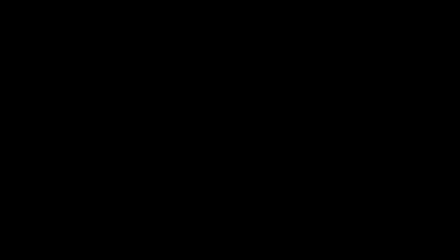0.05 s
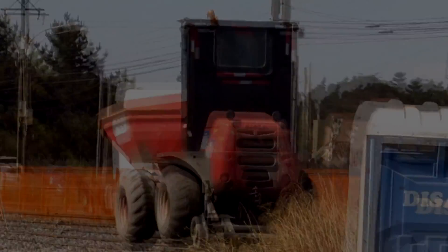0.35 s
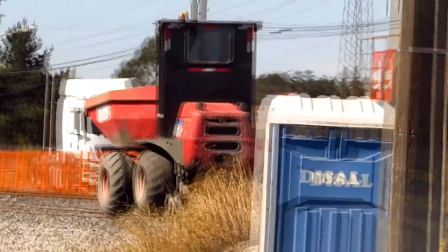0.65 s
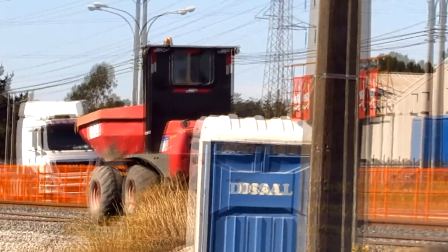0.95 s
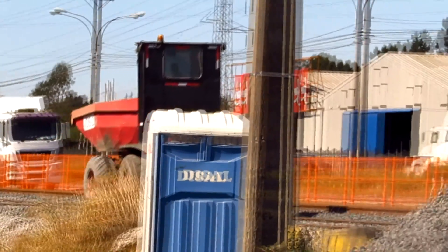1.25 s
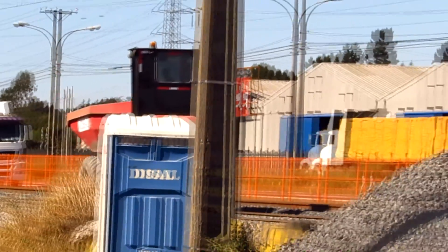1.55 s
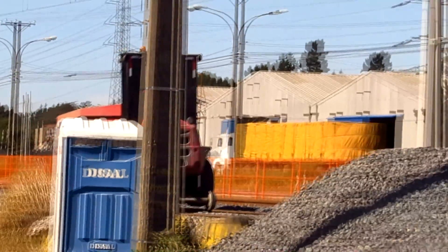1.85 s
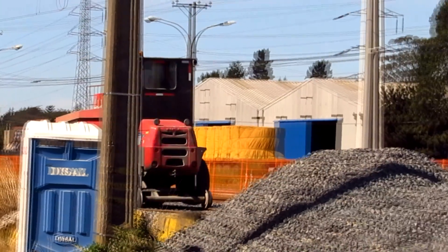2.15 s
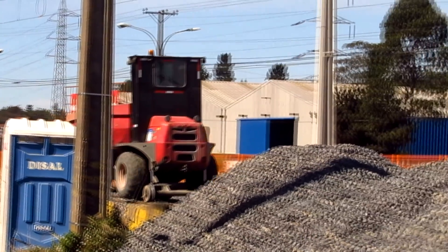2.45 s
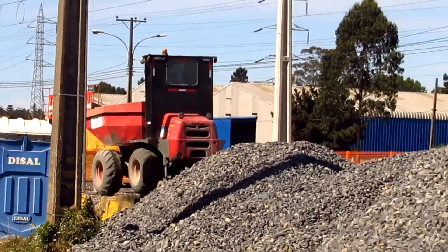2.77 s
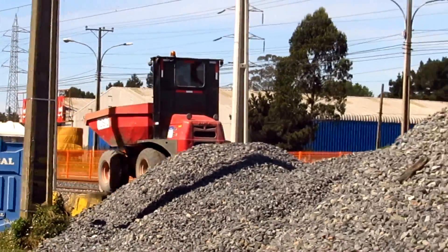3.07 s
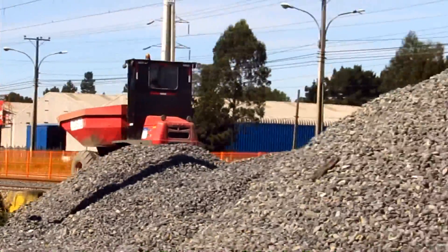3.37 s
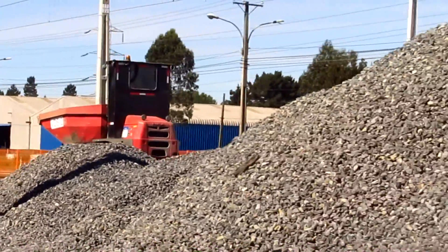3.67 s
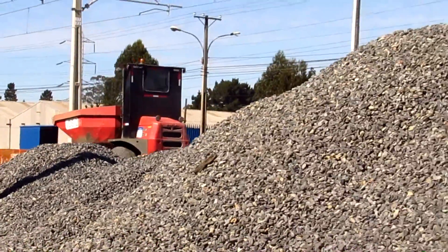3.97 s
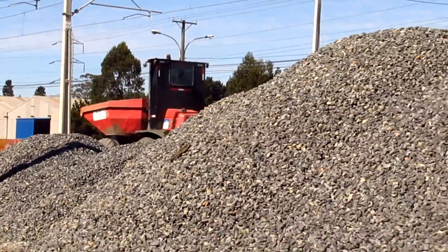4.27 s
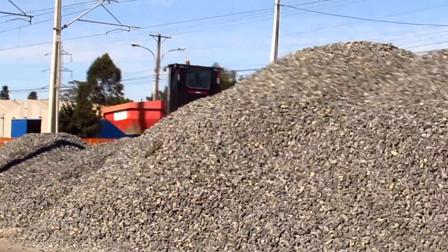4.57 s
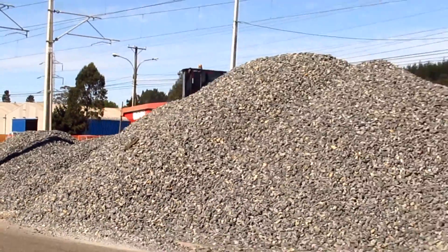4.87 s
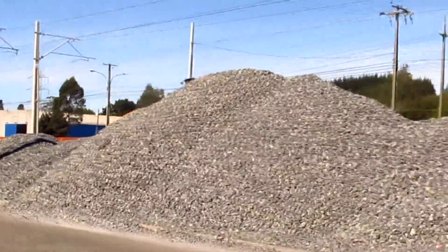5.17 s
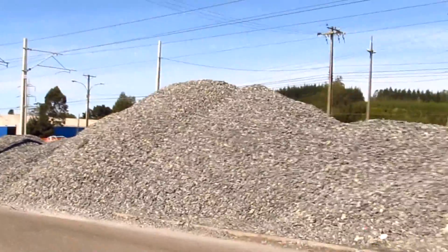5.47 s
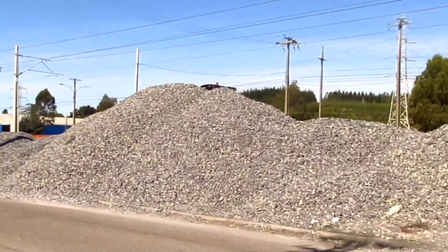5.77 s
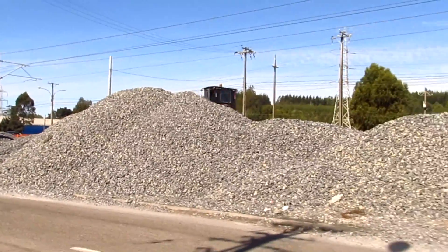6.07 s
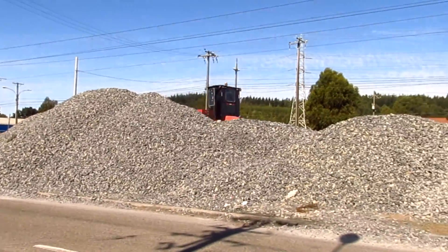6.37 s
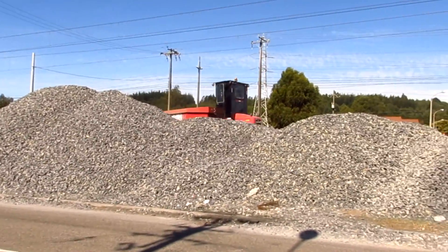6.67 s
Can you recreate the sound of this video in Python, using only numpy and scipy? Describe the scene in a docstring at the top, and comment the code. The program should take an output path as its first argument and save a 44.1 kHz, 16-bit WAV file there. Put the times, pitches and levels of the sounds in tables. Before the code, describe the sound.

A diesel rail dumper rolls along an outdoor track some way off, rumbling and clattering under a thin whine. A bright hiss cuts off near the start, and steel squeaks faintly. Strong gusts then buffet and crackle on the microphone, and the engine dips before creeping back. Later come a brief metal groan, low thuds and a wavering wheel ring, with a faint high shimmer from the rail.

```python
"""A diesel rail dumper rolls along a track some way off: its cylinders rumble and clatter, its exhaust booms,
its drive whines. The engine's sound comes up in level as a bright hiss stops, and steel squeaks on steel.
From about 1.5 s gusts buffet the microphone; the gain control ducks everything and creeps back.
Near 4.3 s the rail starts to sing. The machine thuds and passes behind a gravel heap, where a rubbed
wheel begins to ring and something ticks once; at 6.5 s it comes clear and the rail sings louder."""
import sys
import numpy as np
from scipy import signal
from scipy.fft import rfft, irfft, next_fast_len
from scipy.io import wavfile
from scipy.ndimage import uniform_filter1d

SR = 44100
rng = np.random.default_rng(int(sys.argv[2]) if len(sys.argv) > 2 else 0)


def output_pcm(signal):
    """Save a mono or channel-first signal as 16-bit PCM at the path in sys.argv[1].

    Samples are clipped to [-1, 1] before scaling.
    """
    pcm = np.clip(np.atleast_2d(signal).T, -1, 1) * 32767
    wavfile.write(sys.argv[1], SR, np.round(pcm).astype(np.int16))


N = 305613
T = np.arange(N) / SR
HZ = np.fft.rfftfreq(N, 1 / SR)

# tone colour of the engine's rumble and clatter: (frequency [Hz], relative level [dB])
ENGINE_EQ = [(25,-21), (45,-12), (70,-2.5), (100,-3.5), (145,-2), (200,-3.5), (270,-4.5), (340,-10),
             (480,-16), (680,-18), (870,-23.5), (1150,-25.5), (1600,-33), (2300,-39)]
# punch of each cylinder, in firing order: (relative level [dB])
CYLINDER_ACCENTS = [-6, -4, 1.5, -1]
# steady engine tones: (pitch [multiple of the firing rate], level against the rumble [dB])
ENGINE_TONES = [(1, -12), (1.249, -9.5), (1.5, -22), (1.999, -14.5), (3.33, -13), (3.85, -11),
                (6.44, -17.5)]
# fader ride of the clatter as the machine passes: (time [s], level [dB])
CLATTER_RIDE = [(.25, -32), (1.5, -31.5), (1.75, -29.5), (2.05, -30.5), (2.7, -32), (3.15, -28.5),
                (4.3, -30.5), (5.6, -31.5), (6.93, -30)]
# hiss of the running gear: (frequency [Hz], relative level [dB])
GEAR_HISS_EQ = [(1900,2), (2500,1.5), (3100,-5), (3550,-6.5), (4100,-7.5), (4650,-6.5), (5600,-9.5),
                (7200,-14.5), (9500,-20.5), (15000,-29.5)]
# the drive's whine, sinking as the drive slows: (time [s], pitch [Hz])
WHINE_PITCH = [(.25, 1762), (.8, 1762), (1.2, 1712), (1.55, 1675), (1.87, 1636), (2.17, 1610), (2.3, 1672),
               (2.45, 1630), (2.9, 1625), (3.5, 1606), (4.4, 1578), (5.3, 1596), (5.75, 1597), (6.2, 1583),
               (6.5, 1568), (6.93, 1548)]
# spells where the whine firms up: (start [s], end [s], level [dB])
WHINE_SPELLS = [(0.193, 0.472, -47), (.47, 0.713, -54), (0.825, 0.89, -48), (1.18, 1.77, -48),
                (1.77, 1.955, -45.5), (2.24, 2.346, -48), (2.883, 3.35, -52.5), (3.35, 4.03, -47),
                (4.08, 4.5, -57), (5.35, 6.1, -56), (6.424, 6.92, -45.8)]
# tone colour of the opening spurt of hiss: (frequency [Hz], relative level [dB])
SPURT_EQ = [(900, 9.5), (1400, 5.5), (1750, 9), (2400, 4), (3200, -2), (5000, -10), (7000, -17),
            (10000, -27), (15000, -46)]
# whistles inside the spurt: (pitch [Hz], relative level [dB])
SPURT_TONES = [(1680, -41.5), (1843, -55.5), (2039, -48), (2159, -52), (2480, -57), (2729, -59),
               (2872, -54), (3029, -64), (3440, -58), (4510, -67)]
# gusts on the microphone: (start [s], end [s], level [dB], fine eddies against the gust [dB])
WIND_GUSTS = [(1.39, 1.42, -20, -1.5), (1.563, 1.639, -12, 0), (1.628, 1.744, -10, -35),
              (1.796, 1.883, -3.5, -35), (1.903, 1.957, 6, -25), (2.091, 2.306, 3, -24.5),
              (2.396, 2.413, -10.5, 1), (2.449, 2.479, -14, -10), (2.496, 2.531, 7, -11),
              (2.537, 2.589, 2.5, -11.5), (4.27, 4.284, -7.5, -31), (4.44, 4.514, -15.5, -23),
              (4.726, 4.771, -25, -31), (5.389, 5.435, -17, -29.5)]
# buffeting of a strong gust: (frequency [Hz], relative level [dB])
WIND_EQ = [(20, -40.5), (45, -11.5), (80, -4), (145, 2.5), (220, -2.5), (330, -10.5), (480, -22.5),
           (750, -47.5), (1500, -66), (4000, -99)]
# single eddies slapping the microphone: (time [s], signed peak [relative], pitch [Hz], half length [s])
EDDY_SLAPS = [(1.4307, 1.25, 140, .0058), (1.5688, -2.5, 170, .0035), (1.6066, 5.7, 140, .0027),
              (1.9151, 3.5, 220, .0025), (1.9455, -3.6, 200, .0025), (2.4098, 4.6, 230, .0024),
              (2.4906, 6.2, 300, .0026), (2.5072, -2.2, 190, .003), (2.561, 2.1, 430, .0014)]
# sharp overload cracks on the wind slaps, in both channels:
# (time [s], signed peak [linear], pitch [Hz], half length [s])
OVERLOAD_CRACKS = [(1.5686, -.03, 1400, .00025), (1.6066, .24, 1200, .00019), (2.4906, .26, 1400, .00016),
                   (2.5068, .06, 1100, .0011), (2.5295, .06, 850, .001), (2.5614, .11, 850, .0008)]
# steel squeaks, groans and scrapes: (start [s], end [s], pitch [Hz], width [Hz], level [dB])
STEEL_SQUEAKS = [(0.678, 0.707, 3170, 70, -58), (.83, 0.872, 4890, 260, -65),
                 (0.91, 0.948, 4840, 170, -59.5), (.99, 1.35, 5700, 1200, -66),
                 (3.773, 3.815, 5300, 200, -65), (3.815, 3.882, 4830, 350, -66), (4.72, 5.05, 562, 24, -39),
                 (4.79, 4.95, 7200, 3000, -68), (5.2, 5.335, 950, 35, -42), (5.53, 5.88, 7340, 2400, -68.5),
                 (5.55, 6.5, 1300, 30, -55), (5.6, 5.63, 11050, 300, -70), (6.52, 6.847, 6950, 1310, -67),
                 (6.551, 6.95, 2490, 600, -56.5)]
# deep thuds of the machine: (time [s], signed peak [linear], pitch [Hz], half length [s])
MACHINE_THUDS = [(4.8, 0.057, 80.1, 0.15), (4.956, 0.055, 95, 0.015), (5.335, 0.083, 148.4, 0.046),
                 (5.525, 0.079, 153, 0.016), (5.79, 0.11, 116, .025), (5.887, 0.18, 149, 0.019),
                 (6.015, 0.16, 132, 0.011), (6.14, 0.18, 141, 0.0077), (6.225, 0.083, 113, 0.012),
                 (6.27, 0.14, 123, 0.018), (6.415, 0.16, 142, 0.059), (6.54, 0.072, 223.7, 0.014),
                 (6.765, 0.095, 144.6, 0.029), (6.8243, -0.25, 156, 0.0048), (6.833, 0.15, 239, 0.0091)]
# the ringing wheel: (time [s], pitch [Hz])
WHEEL_PITCH = [(5.82, 930), (5.94, 972), (6.06, 1016), (6.3, 982), (6.93, 970)]
# the microphone pair: (frequency [Hz], left minus right [dB], left lead [rad], likeness [0-1])
STEREO_IMAGE = [(40.4, 14.5, -0.074, 0.84), (154, 16.5, -1.28, 0.89), (277, 13.5, -1.02, 0.89),
                (483, 8, -1.25, 1), (1010, 2, -0.64, 0.7), (2500, 0, -0.35, 0.97), (4460, 1, -0.2, 0.83),
                (7140, 0, -0.97, 0.31), (12000, -0.5, -1.84, 0.33)]

# the machine slips behind the gravel heap, then comes clear: (time [s], soft edge [s])
HIDE, CLEAR = (5.03, 0.13), (6.48, 0.069)


def amp(db):
    """Decibels to gain."""
    return 10 ** (np.asarray(db) / 20)


def unit_rms(x):
    """Scales to rms 1."""
    return x / np.sqrt(np.mean(x ** 2) + 1e-20)


def automation(rows):
    """A line through (time, value) points, at every sample."""
    return np.interp(T, *np.transpose(rows))


def spectra(rows):
    """Each column of a table of frequencies, at every bin."""
    hz, *columns = np.transpose(rows)
    return [np.interp(np.log(HZ + 1), np.log(hz), column) for column in columns]


def shaped(x, gain):
    """Filters by a gain per bin; rms 1."""
    return unit_rms(irfft(rfft(x) * gain, N))


def lowpass(hz, order):
    """Gain of a low-pass at every bin."""
    return 1 / np.sqrt(1 + (HZ / hz) ** (2 * order))


def noise():
    """White noise."""
    return rng.standard_normal(N)


def drift(rate_hz):
    """A random wobble up to about the given rate; rms 1."""
    size = next_fast_len(N)
    rolloff = np.sqrt(1 + (np.fft.rfftfreq(size, 1 / SR) / rate_hz) ** 6)
    return unit_rms(irfft(rfft(rng.standard_normal(size)) / rolloff, size)[:N])


def resonance(hz, width_hz):
    """A randomly excited ring, a narrow band of noise whose pitch may glide."""
    angle = 2 * np.pi * np.cumsum(hz * np.ones(N)) / SR
    return unit_rms(drift(width_hz / 2) * np.cos(angle) + drift(width_hz / 2) * np.sin(angle))


def rise(start, edge):
    """A soft step from 0 to 1."""
    return (1 + np.tanh((T - start) / edge)) / 2


def gate(start, end, edge):
    """Opens between two times, with soft edges."""
    return rise(start, edge) - rise(end, edge)


def puffs(rows, lag=0):
    """Short pressure swings, each under a bell-shaped fade."""
    t = T - lag
    return sum(peak * np.cos(2 * np.pi * hz * (t - at)) * np.exp(-np.minimum(((t - at) / half) ** 2, 50))
               for at, peak, hz, half in rows)


def engine(firing_hz=73.4, unevenness=0.35, knock=0.042, pulse_share=0.3, opening_dip_db=-5):
    """Four cylinders fire: pulses and turbulent gas rumble, metal clatters, the running gear hisses."""
    turns = np.cumsum(firing_hz * (1 + 0.00828 * drift(2.96))) / SR  # one turn per firing
    firing = turns.astype(int)
    strength = amp(CYLINDER_ACCENTS)[firing % len(CYLINDER_ACCENTS)] * (1 + unevenness * noise()[firing])
    pulses = unit_rms(np.diff(firing, prepend=0) * strength)
    knocks = unit_rms(strength * np.exp(-(turns % 1) / 0.65))
    rattle = (1 + knock * knocks) * amp(0.5 * drift(65))

    # rumble and hiss partly follow the clatter's fader; the heap shades both
    clatter_db = automation(CLATTER_RIDE)
    swell_db = clatter_db + 29.5
    passed, clear = rise(*HIDE), rise(*CLEAR)
    rumble_db = -24 + 0.77 * swell_db - 1.2 * passed
    hiss_db = -54.5 + 0.37 * swell_db - 3 * (passed - clear) + 0.2 * clear

    colour, hiss_colour = amp(spectra(ENGINE_EQ)[0]), amp(spectra(GEAR_HISS_EQ)[0])
    lows, below_treble = lowpass(362, order=4), lowpass(1950, order=4)
    tones = sum(amp(db + 3.43 * drift(3.9)) * np.sin(2 * np.pi * (multiple * turns + rng.random()))
                for multiple, db in ENGINE_TONES)
    rumble = shaped(pulse_share * pulses + noise(), colour * lows) + tones
    rumble *= amp(rumble_db + 0.7 * drift(30))
    clatter = shaped(rattle * noise(), colour * np.sqrt(1 - lows ** 2) * below_treble)
    clatter *= amp(clatter_db + 0.57 * drift(5.5))
    hiss = shaped(rattle * noise(), hiss_colour * np.sqrt(1 - below_treble ** 2))
    hiss *= amp(hiss_db + 0.88 * drift(16))
    opening_rise = amp(opening_dip_db * (1 - rise(0.45, edge=0.034)))
    return (rumble + clatter + hiss) * opening_rise


def exhaust_boom(level_db=-37, hidden_boost_db=5):
    """The exhaust pipe's deep resonance: nearly even in strength, fuller behind the heap."""
    pipe = np.tanh(2 * resonance(145, width_hz=28))
    hidden = rise(*HIDE) - rise(*CLEAR)
    return shaped(pipe, lowpass(210, order=6)) * amp(level_db + hidden_boost_db * hidden)


def drive_whine(floor_db=-56.5, waver=0.0015, skirt_db=-16):
    """A whine that follows the drive's speed, in a fuzzy skirt, over the steady ring of its casing."""
    hz = automation(WHINE_PITCH)
    floor = amp(floor_db + 2.5 * drift(7))
    flutter = amp(0.7 * drift(10))
    swells = sum(amp(db) * gate(start, end, edge=0.014) for start, end, db in WHINE_SPELLS)
    tone = unit_rms(np.sin(2 * np.pi * np.cumsum(hz * (1 + waver * drift(27))) / SR))
    casing = amp(-51.5) * resonance(1640, width_hz=240)
    skirt = amp(skirt_db) * resonance(hz, width_hz=110)
    return (floor + swells) * flutter * (tone + skirt) + casing


def spurt(level_db=-36, shut_s=0.48, growth_db_per_s=14, decay_db_per_s=55):
    """A bright, whistling hiss, perhaps oil through a valve: it builds, shuts off and tails away."""
    colour = amp(spectra(SPURT_EQ)[0]) * (1 - lowpass(620, order=3))
    hiss = amp(level_db + 0.89 * drift(35)) * shaped(noise(), colour)
    whistles = sum(amp(db - 4) * resonance(hz, width_hz=14) for hz, db in SPURT_TONES)
    build = amp(-growth_db_per_s * np.maximum(shut_s - T, 0))
    shut = rise(shut_s, edge=0.033)
    tail = amp(-13 - decay_db_per_s * np.maximum(T - shut_s, 0))
    return (hiss * build + whistles) * (1 - shut + shut * tail)


def line_whistle(hz=15734, tremolo_hz=13.5):
    """The camera's own faint, trembling line whistle."""
    return amp(-75) * np.sin(2 * np.pi * hz * T) * (1 + 0.6 * np.sin(2 * np.pi * tremolo_hz * T))


def wind(breeze_db=-34.5, windy_db=-8, left_db=2.5, eddy_limit=1.9, gust_edge_s=0.0053):
    """Eddies push the two microphone ports opposite ways; harder gusts are brighter and crackle."""
    breeze = amp(breeze_db) + amp(windy_db) * gate(1.58, 2.6, edge=0.014)
    force, fine_force = breeze * amp(2 * drift(4.2)), 0
    for start, end, db, fine_db in WIND_GUSTS:
        gust = amp(db) * gate(start, end, gust_edge_s)
        force += gust
        fine_force += gust * amp(fine_db)

    colour, eddies = amp(spectra(WIND_EQ)[0]), noise()
    bright = shaped(eddies, colour)
    dull = shaped(eddies, colour * lowpass(170, order=1) / (HZ + 40))
    hardness = force / (force + 0.32)
    push = hardness * bright + (1 - hardness) * dull
    # level and soft-limit the eddies, so that the gust sets the force
    push /= np.sqrt(uniform_filter1d(push ** 2, size=1300) + 0.18)
    push /= (1 + (abs(signal.hilbert(push)) / eddy_limit) ** 6) ** (1 / 6)

    lumps = amp(5 * drift(90))
    crackle_band = lowpass(470, order=4) * (1 - lowpass(120, order=3))
    *port_crackles, shared_crackle = [fine_force * shaped(lumps * noise(), crackle_band) for _ in range(3)]
    buffet = force * push + shared_crackle
    left, right = [amp(-14) * force * shaped(noise(), colour) + 0.32 * crackle
                   for crackle in port_crackles]
    left += amp(left_db) * (buffet + puffs(EDDY_SLAPS))
    right -= buffet + 0.9 * puffs(EDDY_SLAPS, lag=0.00008)  # a slap sucks at this port a hair later
    return np.array([left, right]) + puffs(OVERLOAD_CRACKS)


def squeaks(fade_share=0.16):
    """Steel rubs on steel: narrow bands squeak and groan, wide ones scrape."""
    return sum(amp(db) * gate(start, end, fade_share * (end - start)) * resonance(hz, width_hz)
               for start, end, hz, width_hz, db in STEEL_SQUEAKS)


def rail_song(start_s=4.3, level_db=-66, clear_boost_db=5.5):
    """The rail sings under the wheels: a high shimmer that lifts once the machine clears the heap."""
    level = amp(level_db + clear_boost_db * rise(*CLEAR) + 1.5 * drift(11))
    return level * rise(start_s, edge=0.25) * resonance(4610, width_hz=1000)


def thuds():
    """Low pressure swings from the machine: short ones thud, long ones boom."""
    return puffs(MACHINE_THUDS)


def wheel_ring(start_s=5.79, level_db=-40.5, wander_hz=4, flutter_db=2.5):
    """The rail rubs one mode of a steel wheel until it rings, wavering with the contact."""
    ring = resonance(automation(WHEEL_PITCH) + wander_hz * drift(12), width_hz=26)
    flutter = unit_rms(amp(flutter_db * drift(18)))
    return amp(level_db) * rise(start_s, edge=0.05) * ring * flutter


def tick(at_s=6.2205, level_db=-43.5, decay_s=0.002):
    """One tiny dry tick with a short ring."""
    decay = np.exp(-np.clip((T - at_s) / decay_s, 0, 50)) * (T > at_s)
    click = shaped(noise(), (1 - lowpass(2500, order=2)) * lowpass(9000, order=1))
    return amp(level_db) * decay * (click + 0.8 * resonance(3600, width_hz=700))


def microphone_pair(direct, diffuse):
    """Two close ports: direct sound leans left in the bass; scattered sound adds width."""
    balance_db, phase, likeness = spectra(STEREO_IMAGE)
    lean = amp(balance_db / 2) * np.exp(0.5j * phase)
    mid = rfft(direct)
    side = rfft(diffuse) * np.sqrt((1 - likeness) / (1 + likeness))
    pair = np.array([(mid + side) * lean, (mid - side) / lean])
    return irfft(pair / abs((lean + 1 / lean) / 2), N)


def scene(start_s=0.25):
    """The mix: the machine, direct and scattered, with wind and line whistle, after a beat of silence."""
    direct = engine() + exhaust_boom() + drive_whine() + thuds()
    direct += wheel_ring() + squeaks() + rail_song() + spurt() + tick()
    diffuse = engine() + exhaust_boom() + thuds() + rail_song() + 0.2 * spurt()
    fade_in = np.clip((T - start_s) / 0.0043, 0, 1)
    return (microphone_pair(direct, diffuse) + wind() + line_whistle()) * fade_in


def peak_hold(over_db, release_db_per_s):
    """Instant attack, steady release."""
    fall = T * release_db_per_s
    return np.maximum.accumulate(over_db + fall) - fall


def record(dry, threshold_db=-9, cutoff_hz=15900):
    """Gain control ducks the mix with a slow and a quick release; sharp slaps clip; the top is cut."""
    power_db = 10 * np.log10(abs(uniform_filter1d((dry ** 2).mean(0), size=800)) + 1e-12)
    over_db = np.maximum(power_db - threshold_db, 0)
    slow_db = peak_hold(0.95 * over_db, release_db_per_s=4.61)
    quick_db = peak_hold(over_db, release_db_per_s=17)
    duck_db = uniform_filter1d(np.maximum(slow_db, quick_db), size=200)
    clipped = np.clip(dry / amp(duck_db), -1, 1)
    high_cut = signal.firwin(1023, cutoff_hz, window=("kaiser", 9), fs=SR)
    return signal.oaconvolve(clipped, high_cut[None], "same")


dry = scene()
out = record(dry)
output_pcm(out)
```